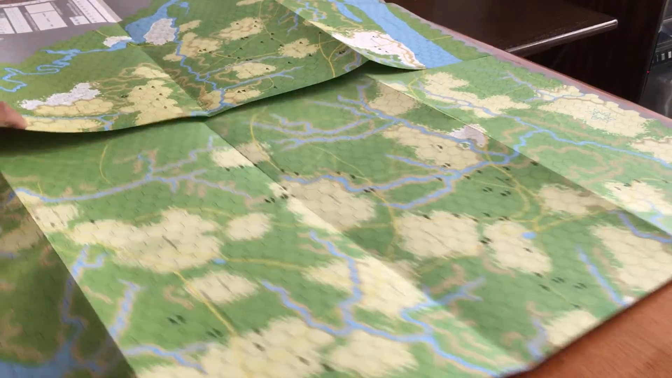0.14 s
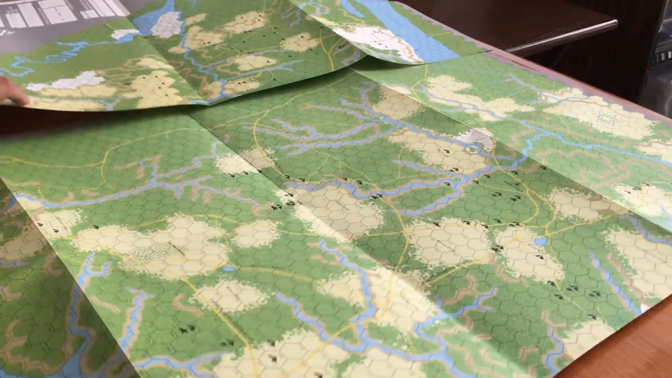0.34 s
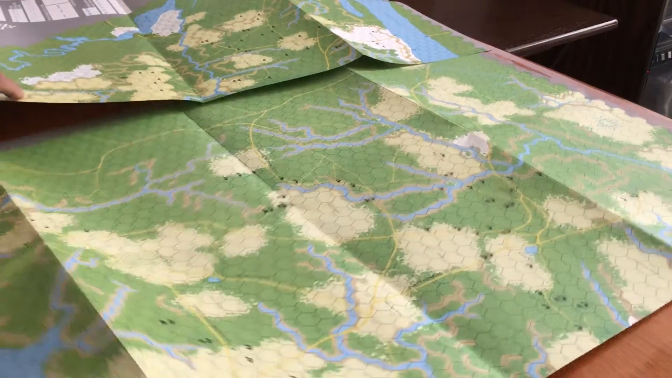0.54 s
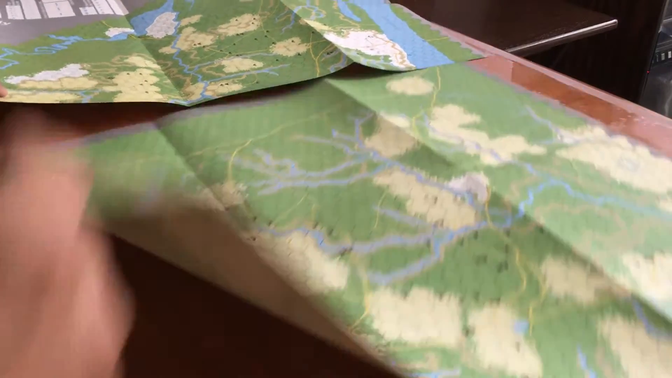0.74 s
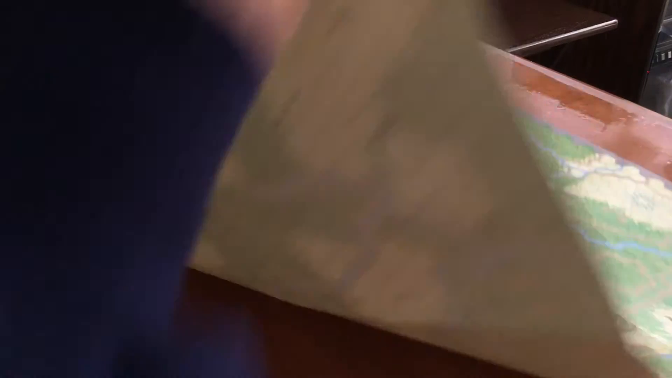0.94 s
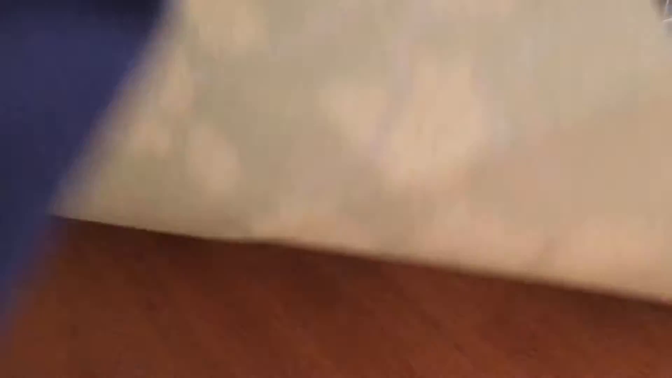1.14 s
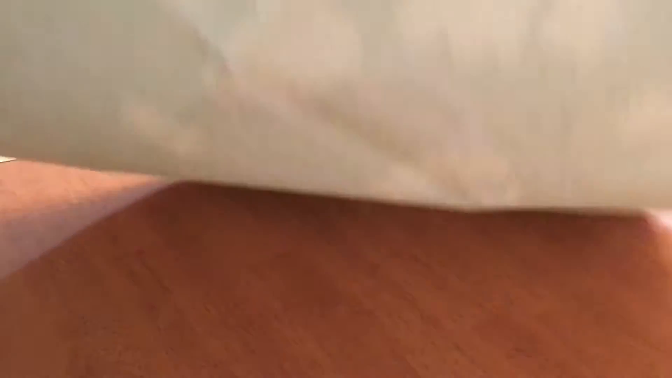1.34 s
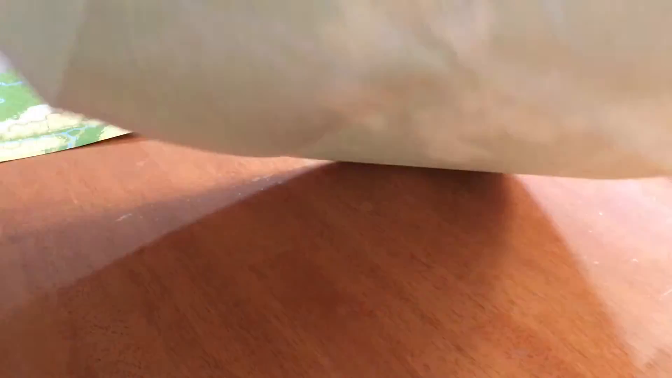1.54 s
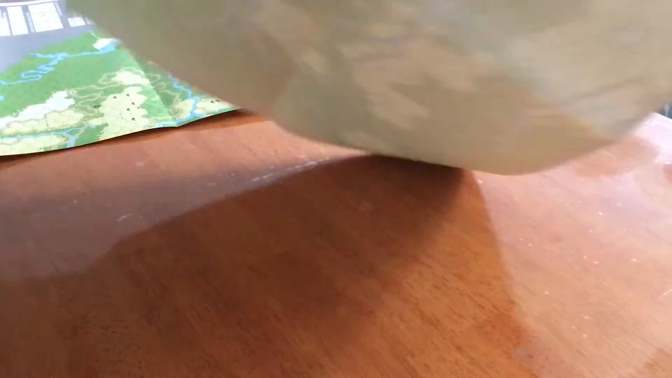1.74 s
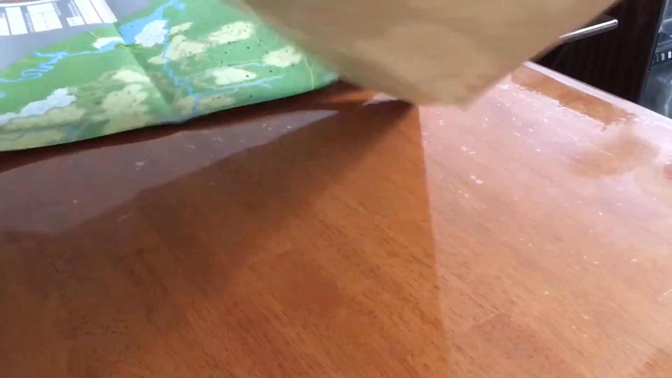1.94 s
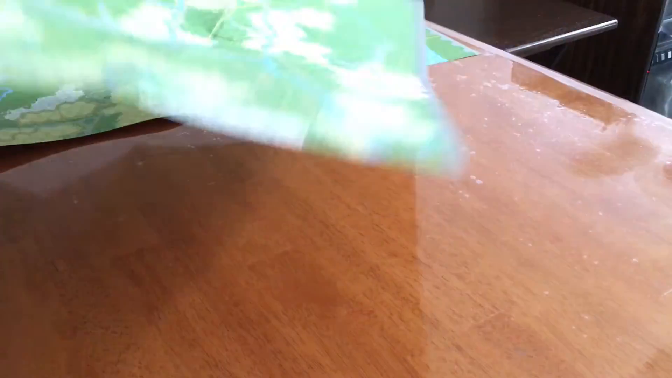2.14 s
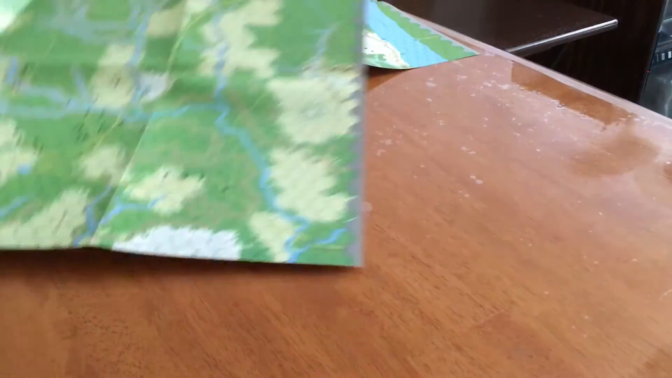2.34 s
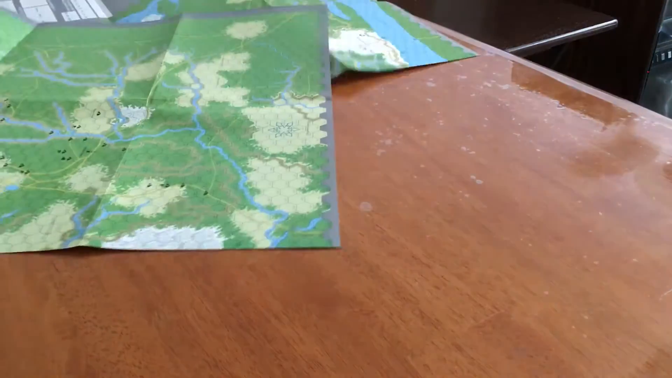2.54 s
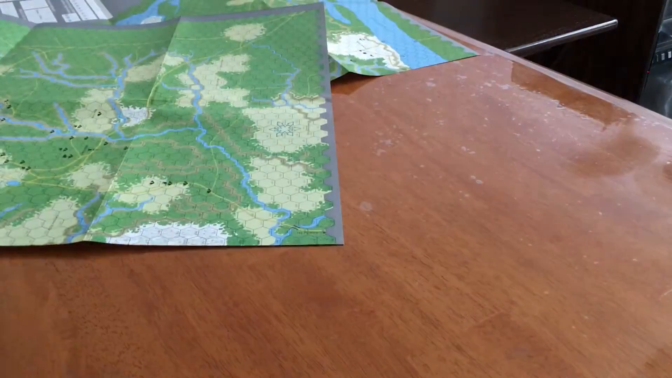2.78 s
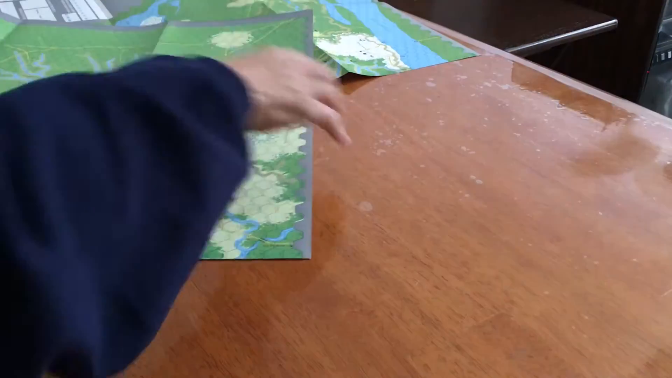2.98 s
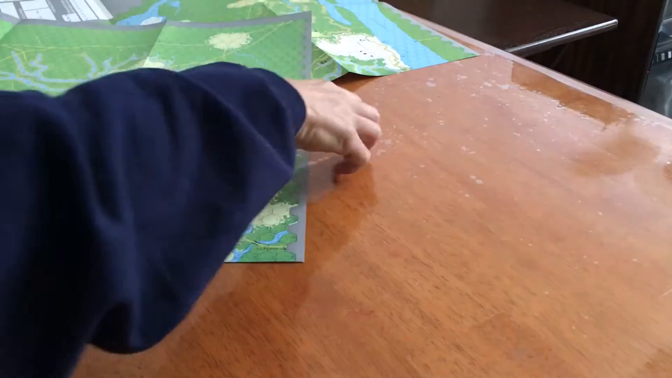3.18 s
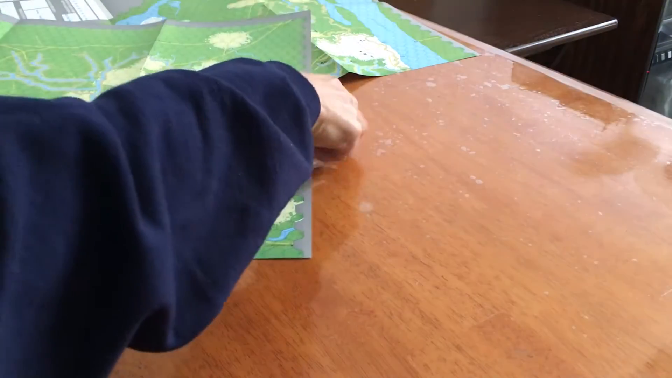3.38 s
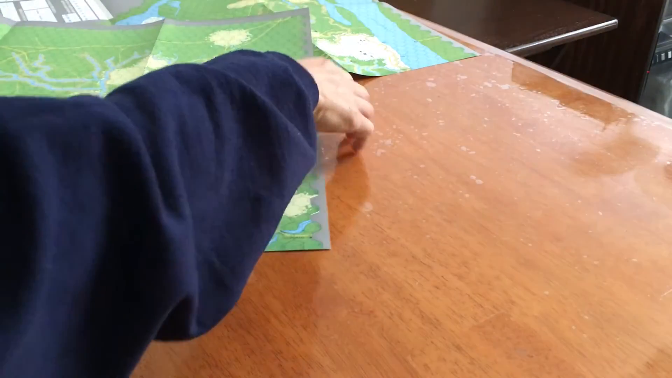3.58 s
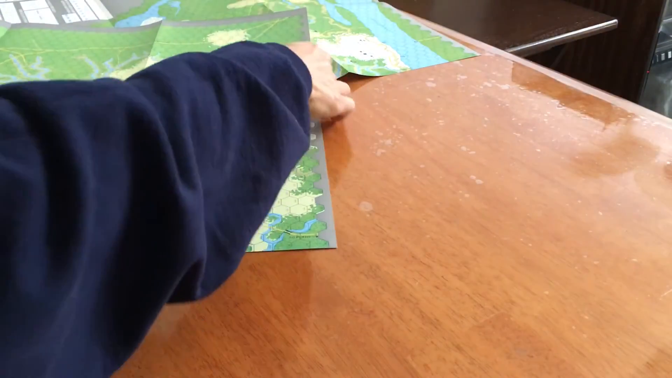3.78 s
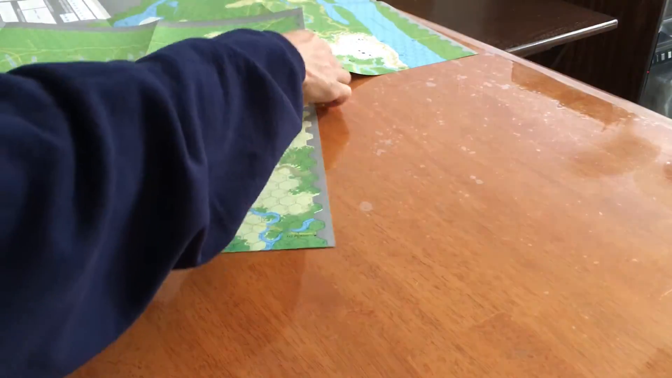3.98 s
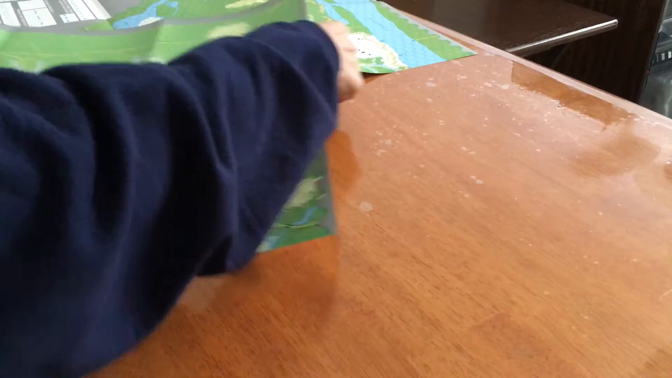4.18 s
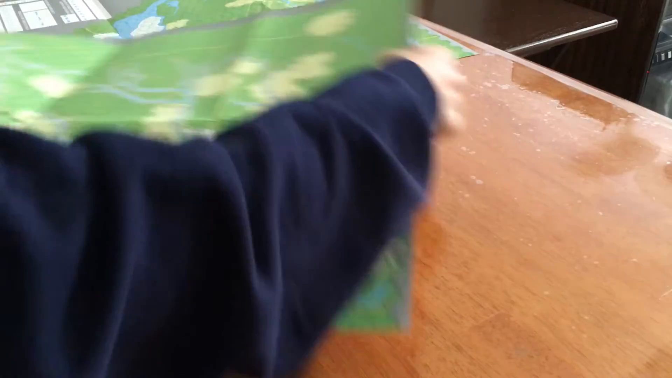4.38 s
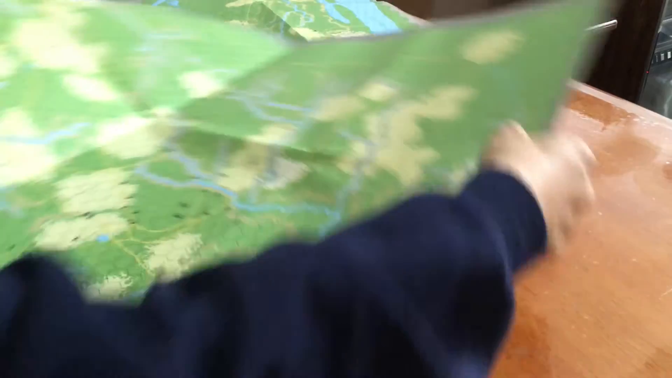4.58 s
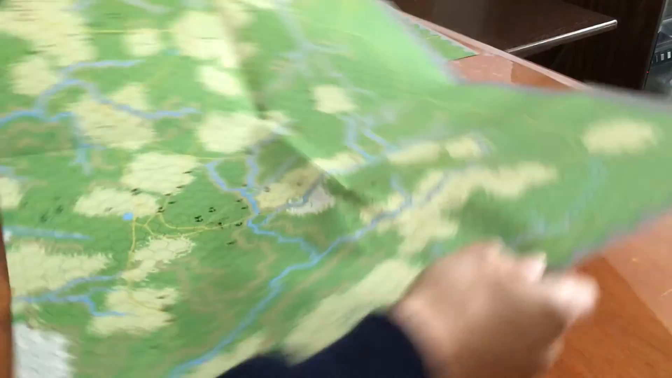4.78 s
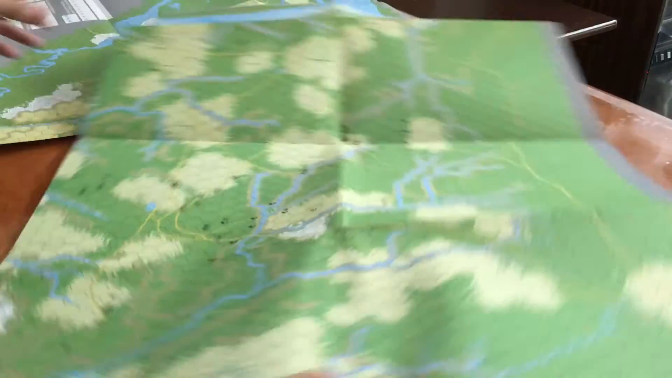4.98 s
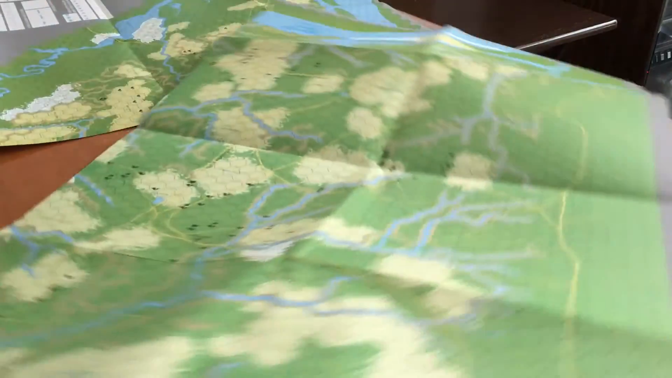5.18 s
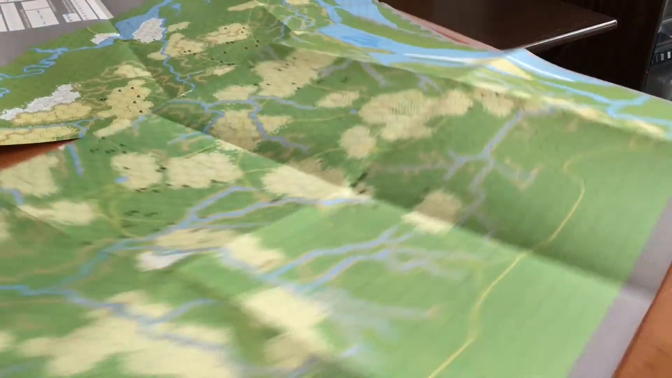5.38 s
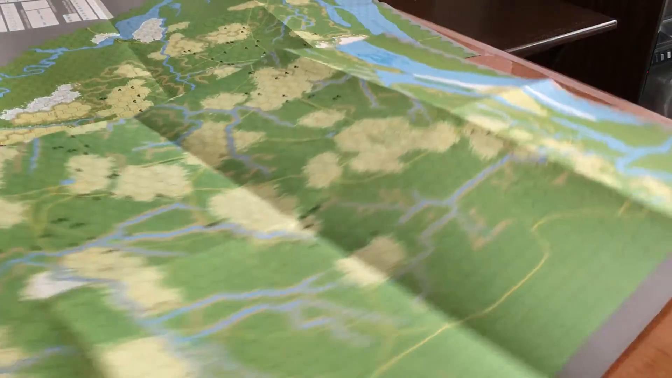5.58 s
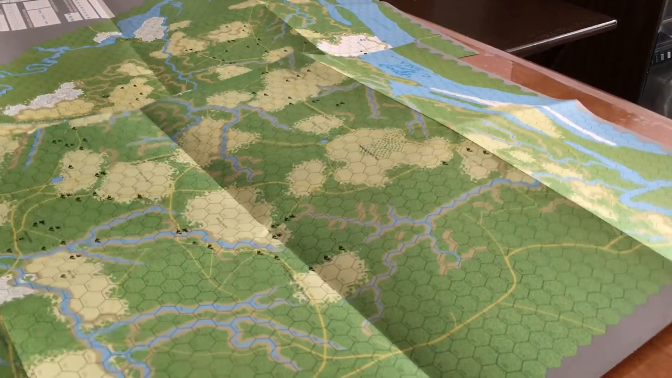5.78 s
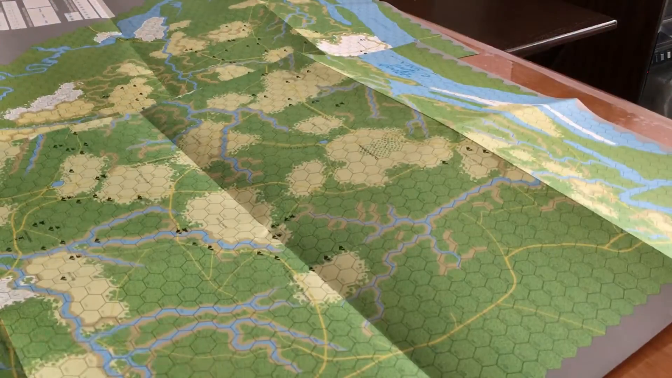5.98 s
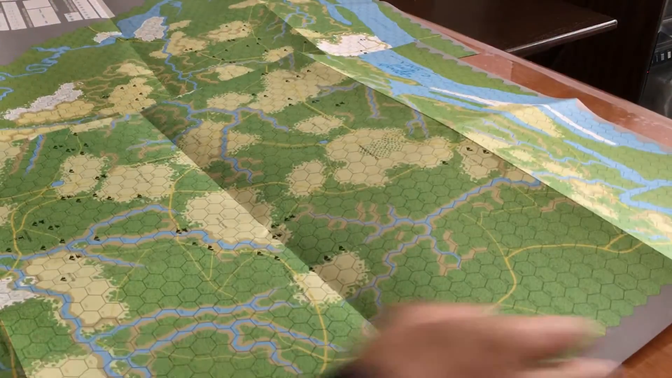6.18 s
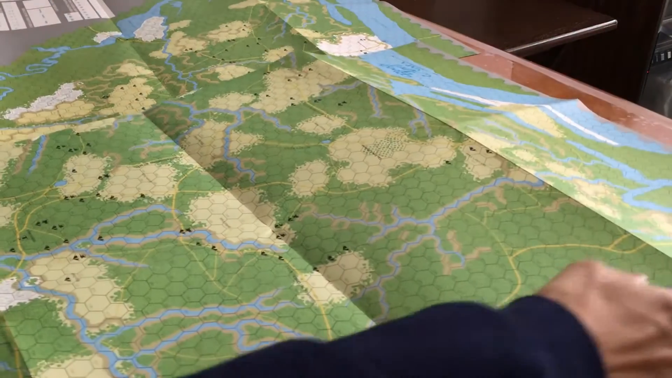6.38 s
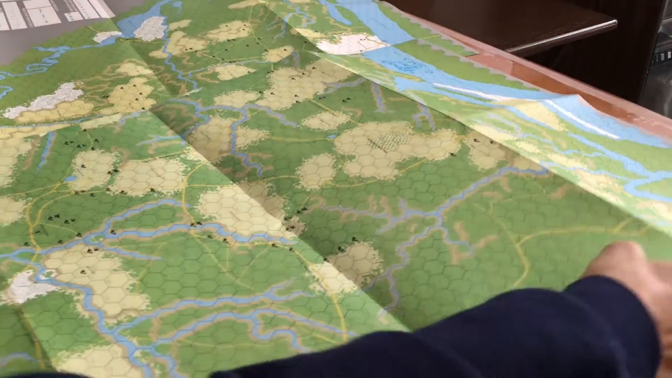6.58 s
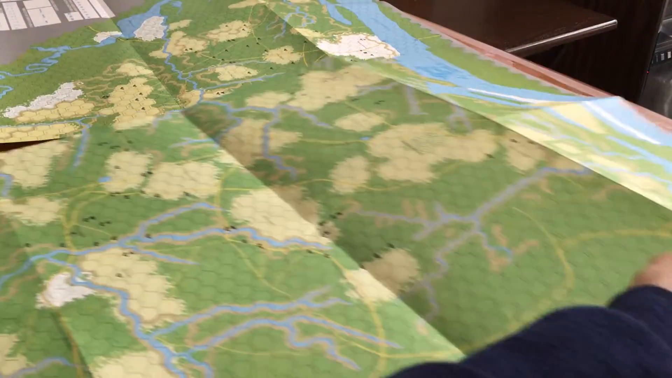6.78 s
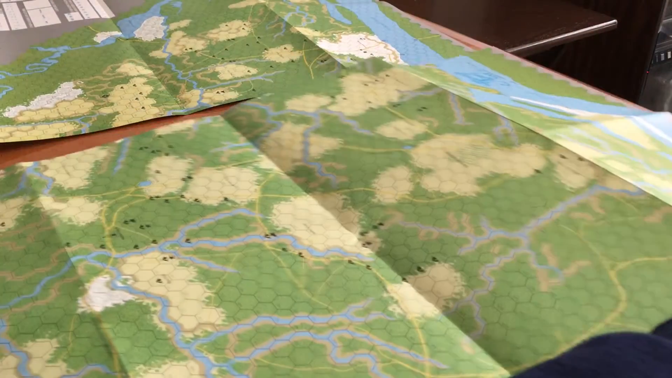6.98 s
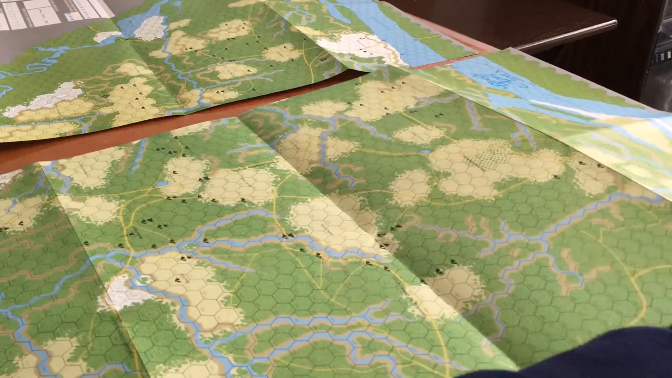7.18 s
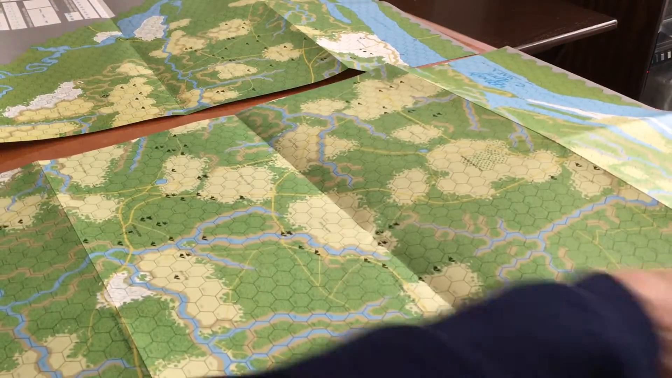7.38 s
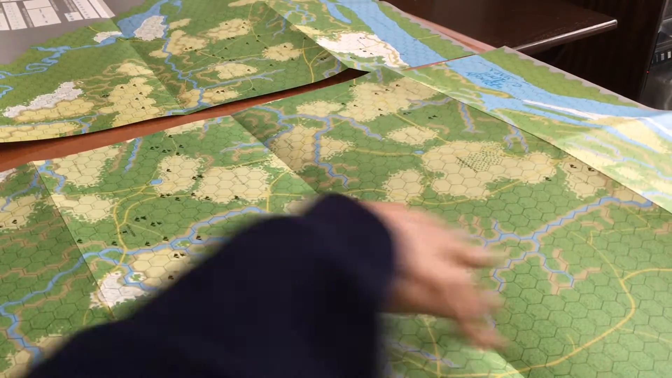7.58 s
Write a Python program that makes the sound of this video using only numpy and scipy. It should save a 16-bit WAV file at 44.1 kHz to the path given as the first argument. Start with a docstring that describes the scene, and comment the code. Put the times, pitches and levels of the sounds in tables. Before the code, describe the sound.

Large stiff folded paper sheets are lifted, flipped with a loud slap and spread over a wooden table, popping, rustling and hissing up close.

```python
"""Stiff panels of large folded paper maps buckle with hollow pops as they are lifted and flipped open:
noise bursts with a jolt, each in its panel's band; one sheet whips over in a run of five, a loud slap.
Creases tick and trapped air thuds the same way; swung sheets flutter and fan the air (shaped noise).
Paper hisses over paper and a wooden table (noise and grains), an edge skids on varnish (ringing grains)
and fingers knock on the wood (decaying modes). Small room, faint rumble, one close microphone."""
import sys
import numpy as np
from scipy import signal
from scipy.fft import rfft, irfft, next_fast_len
from scipy.io import wavfile
from scipy.ndimage import map_coordinates

SR = 44100
rng = np.random.default_rng(int(sys.argv[2]) if len(sys.argv) > 2 else 0)


def unload_wav(signal):
    """Save mono or channel-first audio to the path in sys.argv[1] as 16-bit WAV at rate SR, clipped to [-1, 1]."""
    wavfile.write(
        sys.argv[1],
        SR,
        np.round(np.clip(np.atleast_2d(signal).T, -1, 1) * 32767).astype(np.int16),
    )


N = 336483


def amp(db):
    """Decibels to gain."""
    return 10 ** (np.asarray(db) / 20)


def unit(x):
    """x at rms 1."""
    return x / np.sqrt(np.mean(x ** 2) + 1e-20)


def along(points, hz):
    """(Hz, value) points interpolated on a log frequency axis."""
    point_hz, values = np.transpose(points)
    return np.interp(np.log(hz + 1), np.log(point_hz), values)


def wobble(knots_per_s):
    """Smooth random curve through normally distributed knots."""
    knots = rng.standard_normal(int(N * knots_per_s / SR) + 4)
    return map_coordinates(knots, [np.arange(N) * knots_per_s / SR])


def filtered(x, response):
    """x times a response of frequency."""
    size = next_fast_len(N + 8192)
    spectrum = rfft(x, size) * response(np.fft.rfftfreq(size, 1 / SR))
    return irfft(spectrum, size)[:N]


def coloured(x, spectrum):
    """x shaped by a spectrum in dB, at rms 1."""
    return unit(filtered(x, lambda hz: amp(along(spectrum, hz))))


def add(track, start_s, sound):
    """Mix a sound into the track in place."""
    part = track[round(start_s * SR):][:len(sound)]
    part += sound[:len(part)]


def grains(rate_per_s, spread_db):
    """Random single-sample impulses of uneven size, at rms 1."""
    chance = rng.random(N)
    size = np.clip(rng.standard_normal(N), -2.5, 2.5)
    sign = rng.choice([-1, 1], N)
    return unit((chance < rate_per_s / SR) * sign * amp(spread_db * size))


def resonance(f, hz, width_hz):
    """Response of one resonance, 1 at its centre."""
    return 1j * f * width_hz / (hz * hz - f * f + 1j * f * width_hz)


def gesture(start_s, length_s, attack_s, sag_db_per_s, release_db_per_s):
    """Gain of one movement: it rises, sags while it lasts, then dies away."""
    t = np.maximum(np.arange(N) / SR - start_s, 0)
    rise = np.sin(np.pi / 2 * np.minimum(t / attack_s, 1)) ** 2
    overtime = np.maximum(t - length_s, 0)
    return rise * amp(-sag_db_per_s * t - release_db_per_s * overtime)


def snap(db, low_hz, high_hz, length_s, jolt, bounce, bounce_s):
    """A jolt and a short noisy shiver; the size of the panel sets its band; rms over 10 ms is db."""
    t = np.arange(SR // 5) / SR
    # a slow buckle swells into its shiver, a quick one is mostly jolt
    swell = 1 - np.exp(-4 * t / length_s)
    force = rng.standard_normal(len(t)) * np.exp(-t / length_s) * swell
    force *= np.sqrt(length_s * SR) / np.linalg.norm(force)
    force[0] += jolt / (1 + length_s / 0.0038)
    # the table throws each snap back once, after bounce_s give or take a quarter
    lag = int(bounce_s * SR * rng.uniform(0.76, 1.29)) + 1
    force[lag:] += bounce * force[:-lag]
    # a panel radiates poorly below its band and is too limp above it
    b, a = signal.butter(2, low_hz, 'high', fs=SR)
    limp = signal.butter(3, min(high_hz, SR / 2.2), fs=SR, output='sos')
    pop = signal.sosfilt(limp, signal.lfilter(b, a, force))
    return amp(db) * pop * np.sqrt(SR / 100 / np.sum(pop ** 2))


# Faint steady rumble. Each row: frequency in Hz, relative level in dB.
RUMBLE_SPECTRUM = [(20, -49), (28, -21), (37, 1), (50, -9), (110, -5), (200, -13.5), (450, -25.5),
                   (1500, -26), (5000, -35.5), (16000, -43.5)]


def rumble():
    """The room's steady low rumble: shaped noise."""
    return amp(-65.0) * coloured(rng.standard_normal(N), RUMBLE_SPECTRUM)


# Decay of the room. Each row: frequency in Hz, t60 in s.
ROOM_DECAY = [(100, 0.35), (300, 0.59), (800, 0.21), (2000, 0.29), (6000, 0.2), (15000, 0.23)]


def room(x, wet_db):
    """Nearby walls answer with a decaying noise tail, drawn at random anew every 0.25 s."""
    out, hop = x.copy(), SR // 4
    for start in range(0, N, hop):
        hz, t, bins = signal.stft(rng.standard_normal(SR // 2), SR, nperseg=256)
        decay = amp(-60 * t / along(ROOM_DECAY, hz)[:, None])
        tail = signal.istft(bins * decay, SR, nperseg=256)[1]
        tail = np.pad(tail / np.linalg.norm(tail), (int(0.004 * SR), 0))  # 4 ms delay
        add(out, start / SR, amp(wet_db) * signal.fftconvolve(x[start:start + hop], tail))
    return out


# Table top modes. Each row: frequency in Hz before the shift, relative level in dB, t60 in s.
TABLE_MODES = [(104, -22, 0.083), (291.5, -1, 0.1), (338, 3, 0.034), (520, -6, 0.032), (770, -2, 0.026),
               (1115, -4.5, 0.026), (1600, -8, 0.023)]
# Fingers and sheet edges landing. Each row: start in s, level in dB, hardness (mode rolloff) in Hz.
KNOCKS = [(1.2, -38.5, 700), (1.243, -38, 900), (1.325, -34, 890), (1.505, -34, 1170), (1.711, -39.5, 900),
          (3.17, -42.5, 1780), (3.274, -55, 600), (3.523, -56.5, 600), (3.681, -55, 700),
          (3.753, -58, 1010), (5.905, -44, 1150), (6.114, -38, 2700)]
KNOCK_SHIFT, KNOCK_SCATTER = 1.02, 0.015  # mean and deviation of the mode frequency ratio


def knocking():
    """Soft blows ring the table top; its pitch moves a little with where they land."""
    track, t = np.zeros(N), np.arange(SR // 4) / SR
    onset = 1 - np.exp(-t / 0.0014)
    for start_s, db, hard_hz in KNOCKS:
        ratio = KNOCK_SHIFT + KNOCK_SCATTER * rng.standard_normal()
        for hz, mode_db, t60_s in TABLE_MODES:
            # a soft contact cannot wake the high modes
            softness = 1 + (hz / hard_hz) ** 4
            strength = amp(db + mode_db + rng.normal(0, 1)) / softness
            ring = amp(-60 * t / t60_s) * np.sin(2 * np.pi * hz * ratio * t)
            add(track, start_s, strength * ring * onset)
    return track


# Thin ring of the edge. Each row: frequency in Hz, width in Hz, relative level in dB.
EDGE_RINGS = [(3320, 55, 4), (4500, 220, -3), (6500, 700, -5), (8200, 400, -5), (9300, 260, -4),
              (12000, 200, -10)]
# Edge skidding on varnish. Each row: start in s, length in s, level in dB before the surges.
SKIDS = [(2.66, 0.029, -55), (2.74, 0.027, -64), (2.795, .04, -65), (2.835, .3, -70)]


def skidding():
    """The dropped sheet's edge chatters over the varnish and rings thinly."""
    def ring(f):
        return sum(amp(db) * resonance(f, hz, width_hz) for hz, width_hz, db in EDGE_RINGS)

    push = sum(amp(db) * gesture(start_s, length_s, attack_s=0.012, sag_db_per_s=24, release_db_per_s=231)
               for start_s, length_s, db in SKIDS)
    chatter = unit(filtered(grains(990, spread_db=3), ring))
    return push * amp(3 * wobble(45)) * chatter


# Colour of rubbing paper as the microphone hears it, with its dips near 4950 and 10400 Hz.
# Each row: frequency in Hz, relative level in dB per Hz.
HISS_SPECTRUM = [(300, -14.5), (900, -7.5), (2200, 0.5), (3600, 0.5), (4950, -2), (5800, -0.5), (7200, -4),
                 (9300, -3.5), (10400, -9), (11500, -6.5), (16000, -11)]
# Paper sliding over paper or wood. Each row: start in s, length in s, friction in dB and treble
# against friction in dB, both before the surges and offsets below.
SLIDES = [(0.0, 0.37, -58, -2), (0.4, 0.26, -58, 4), (0.661, 0.13, -48.5, -4), (0.85, 0.25, -58, -14),
          (1.083, 0.28, -65.5, -6), (1.244, 0.044, -52, -10), (1.354, 0.48, -69, -0.5),
          (1.68, 0.065, -70.5, -17), (1.804, 0.087, -62, -5.5), (1.92, 0.19, -59, -15.5),
          (2.456, .055, -59.5, -2), (2.562, 0.24, -58, -9), (2.858, 0.16, -61.5, -4.5),
          (3.093, 0.28, -67, -17), (3.34, 0.32, -65.5, -13), (3.648, 0.17, -75.5, -8),
          (3.868, 0.19, -70.5, -0.5), (4.03, 0.26, -62.5, -12), (4.228, 0.14, -59, 1.5),
          (4.327, 0.32, -52, 2.5), (4.642, 0.17, -51.5, -3.5), (4.897, 0.17, -60, 0.5),
          (5.047, 0.083, -54.5, 2), (5.2, 0.23, -51.5, -0.5), (5.41, 0.28, -55, -2),
          (5.655, 0.14, -52.5, -5), (5.98, 0.15, -63.5, -12), (6.155, 0.37, -77.5, 1),
          (6.386, .15, -66.5, -7), (6.556, 0.12, -54.5, -10), (6.68, 0.18, -56, -1.5),
          (6.899, .16, -57.5, -11), (7.09, 0.073, -62, -7.5), (7.273, 0.053, -62.5, -11),
          (7.417, .15, -71, -5)]
SLIDE_ATTACK_S, SLIDE_SAG_DB_PER_S, SLIDE_RELEASE_DB_PER_S = 0.044, 13.5, 80
SLIDE_RUN_UP = 0.34  # share of its length added to the attack


def sliding():
    """Fibres catch and slip by the thousand; each slide has its own strength and brightness."""
    coarse_power, fine_power = np.zeros((2, N))
    for start_s, length_s, db, treble_db in SLIDES:
        attack_s = SLIDE_ATTACK_S + SLIDE_RUN_UP * length_s
        gain = amp(db) * gesture(start_s, length_s, attack_s, SLIDE_SAG_DB_PER_S, SLIDE_RELEASE_DB_PER_S)
        coarse_power += gain ** 2
        fine_power += (gain * amp(treble_db)) ** 2
    rub = coloured(rng.standard_normal(N) + 0.62 * grains(2500, spread_db=9.5), HISS_SPECTRUM)
    fine = filtered(rub, lambda hz: 1 / (1 + (8000 / (hz + 1)) ** 4))
    coarse = rub - fine
    # coarse and fine fibres grip in their own uneven surges
    coarse_hiss = coarse * np.sqrt(coarse_power) * amp(0.7 * wobble(22))
    fine_hiss = fine * np.sqrt(fine_power) * amp(2 + 0.7 * wobble(22))
    return (coarse_hiss + fine_hiss) * amp(2.5 + 1.4 * wobble(35))


# Air squeezed out under a panel or a palm. Each row: start in s, level in dB, lowest frequency in Hz.
PUFFS = [(1.141, -51, 108), (1.464, -45, 140), (1.751, -49, 126), (2.035, -35, 101), (2.5, -41, 62.5),
         (2.631, -44, 64), (3.174, -43.5, 68), (3.28, -50, 64), (3.753, -50.5, 68), (5.044, -45, 53),
         (5.349, -41.5, 59), (5.79, -49.5, 73.4), (5.905, -51, 60)]
PUFF_SPAN, PUFF_LENGTH_S = 2.67, 0.023  # highest over lowest Hz; decay


def puffing():
    """Trapped air escapes with a low, soft thud."""
    track = np.zeros(N)
    for start_s, db, low_hz in PUFFS:
        thud = snap(db, low_hz, PUFF_SPAN * low_hz, PUFF_LENGTH_S, jolt=1.3, bounce=0.28, bounce_s=0.002)
        add(track, start_s, thud)
    return track


# Creases and edges clicking. Each row: start in s, level in dB, highest frequency in Hz.
TICKS = [(1.281, -57, 8000), (1.502, -52.5, 4860), (1.619, -60, 4950), (2.02, -47, 8400),
         (2.462, -64.5, 11300), (2.494, -52.5, 8600), (2.665, -58, 10800), (3.17, -56.5, 5700),
         (5.575, -44, 8300), (5.768, -46, 4020), (5.887, -53, 3970), (5.9027, -48.5, 9400)]
TICK_LOW_HZ, TICK_LENGTH_S = 1050, 0.0047


def ticking():
    """Creases and edges give short, bright clicks."""
    track = np.zeros(N)
    for start_s, db, top_hz in TICKS:
        add(track, start_s, snap(db, TICK_LOW_HZ, top_hz, TICK_LENGTH_S, jolt=1.8, bounce=0.14, bounce_s=0.001))
    return track


# Colour of the bending sheet. Each row: frequency in Hz, relative level in dB.
FLUTTER_SPECTRUM = [(100, 3), (250, -8), (500, -5), (1000, -5.5), (1700, -15), (2600, -15.5), (6000, -71),
                    (16000, -56)]
# Colour of the fanned air. Each row: frequency in Hz, relative level in dB.
AIR_SPECTRUM = [(20, -3), (50, -0.5), (100, -4.5), (170, 5), (300, -2.5), (450, -15.5), (900, -38),
                (4000, -77)]
# Sheet swung in the hands. Each row: start in s, length in s, flutter in dB and fanned air in dB,
# both before the offsets and surges below.
SWINGS = [(0.534, 0.96, -59.5, -58), (1.18, 0.21, -51, -47), (1.415, 0.26, -56.5, -44),
          (2.31, 0.19, -66.5, -62.5), (2.468, .33, -53.5, -62), (2.998, 0.53, -70.5, -82),
          (4.156, 0.051, -56.5, -62), (4.496, 0.54, -60.5, -61.5), (5.027, 0.4, -60, -60),
          (5.718, 0.19, -58, -58.5), (6.57, 0.13, -60.5, -59.5), (7.042, 0.4, -85, -76)]
SWING_ATTACK_S, SWING_SAG_DB_PER_S, SWING_RELEASE_DB_PER_S = 0.073, 1.5, 63


def flexing():
    """The bending sheet gives a run of small soft buckles and fans the air."""
    buckles = grains(420, spread_db=0.5) + 0.64 * rng.standard_normal(N)
    flutter = coloured(buckles, FLUTTER_SPECTRUM) * amp(-3.5 + 3.1 * wobble(30))
    air = coloured(rng.standard_normal(N), AIR_SPECTRUM) * amp(-6.5 + 3.5 * wobble(20))
    track = np.zeros(N)
    for start_s, length_s, flutter_db, air_db in SWINGS:
        swing = gesture(start_s, length_s, SWING_ATTACK_S, SWING_SAG_DB_PER_S, SWING_RELEASE_DB_PER_S)
        track += swing * (amp(flutter_db) * flutter + amp(air_db) * air)
    return track


# What sheet and table lift or swallow. Each row: frequency in Hz, width in Hz, gain in dB.
BODY_RESONANCES = [(305, 50, 5), (470, 110, 2), (640, 100, -1), (830, 130, 2.5), (1170, 100, 2),
                   (1680, 170, 3.5), (2150, 130, 4), (2700, 500, -4)]


def hollow(x):
    """Resonances in series: the hollow colour of a big sheet held over a table."""
    def response(f):
        stages = [1 + (amp(db) - 1) * resonance(f, hz, width_hz) for hz, width_hz, db in BODY_RESONANCES]
        return np.prod(stages, axis=0)

    return filtered(x, response)


WHIP_AT_S, WHIP_DB, WHIP_HZ, WHIP_LENGTH_S = 2.037, -32, 1620, 0.0065  # first panel
WHIP_GAP_S, WHIP_LOSS_DB, WHIP_HZ_RATIO = 0.0095, 2, 0.6  # from each panel to the next


def whip(count):
    """The flipped sheet pulls flat panel after panel, each larger (lower) and weaker."""
    return [(WHIP_AT_S + k * WHIP_GAP_S, WHIP_DB - k * WHIP_LOSS_DB, WHIP_HZ * WHIP_HZ_RATIO ** k, WHIP_LENGTH_S)
            for k in range(count)]


# Panels snapping through. Each row: start in s, level in dB, lowest frequency in Hz, length in s.
BUCKLES = [(0.281, -54.5, 855, 0.0043), (0.492, -51, 590, 0.019), (0.607, -54, 390, 0.0041),
           (0.647, -45, 490, 0.007), (.722, -47.5, 500, 0.0054), (.735, -44, 550, 0.0042),
           (.788, -37.5, 455, 0.0012), (0.837, -44, 382, 0.003), (0.843, -39, 283, 0.0034),
           (0.934, -46.5, 250, 0.051), (1.009, -46, 236, .022), (1.196, -42.5, 199, 0.019),
           (1.239, -39, 474, .003), (1.315, -36, 393, 0.0043), (1.345, -43.5, 760, 0.0038),
           (1.44, -43, 696, 0.0039), (1.5, -33.5, 247, 0.0039), (1.7, -46.5, 262, 0.0058),
           (1.71, -41, 397, 0.0093), (2.029, -41, 400, 0.0024), (2.084, -44.5, 700, 0.054),
           (2.492, -45, 234, 0.018), (2.601, -46.5, 393, .025), (2.881, -52, 623, 0.039),
           (3.173, -55.5, 437, 0.0012), (3.256, -57.5, 466, 0.021), (3.751, -59.5, 380, 0.039),
           (4.257, -47.5, 840, 0.013), (4.409, -53.5, 700, 0.032), (4.589, -54, 513, 0.0034),
           (4.685, -46.5, 810, 0.043), (4.848, -43, 336, 0.0019), (5.0176, -31, 550, 0.0024),
           (5.157, -36.5, 790, 0.0012), (5.293, -46, 540, 0.0077), (5.298, -32.5, 593, 0.003),
           (5.576, -49, 544, 0.0031), (5.915, -49, 220, 0.0053), (7.158, -64, 400, 0.017)]
# upper edge of a 500 Hz panel at -42 dB; smaller panels and harder snaps reach higher
REACH_HZ, REACH_POWER, REACH_DB_PER_OCTAVE = 1355, 0.24, 31
REBOUND_S, REBOUND_DB = 0.014, -11
CREASE_DB, CREASE_LOW_HZ, CREASE_HIGH_HZ = -18, 3000, 4600
CREASE_SLOW_S = 0.01  # a buckle this long halves its crease click


def buckling():
    """Each panel pops, clicks at its crease and springs back once, more weakly."""
    track = np.zeros(N)
    for start_s, db, panel_hz, length_s in BUCKLES + whip(count=5):
        size_reach = (panel_hz / 500) ** REACH_POWER
        top_hz = REACH_HZ * size_reach * 2 ** ((db + 42) / REACH_DB_PER_OCTAVE)
        for delay_s, drop_db in ((0, 0), (REBOUND_S, REBOUND_DB)):
            pop = snap(db + drop_db, panel_hz, top_hz, length_s, jolt=5.8, bounce=0.19, bounce_s=0.001647)
            add(track, start_s + delay_s, pop)
        click = snap(db + CREASE_DB, CREASE_LOW_HZ, CREASE_HIGH_HZ, length_s,
                     jolt=1.6, bounce=0.13, bounce_s=0.00123)
        add(track, start_s, click / (1 + length_s / CREASE_SLOW_S))
    return track


def scene():
    """Paper and table in the room, over its faint rumble; one microphone feeds both channels."""
    sheet = room(hollow(buckling() + flexing()), wet_db=-6.0)
    contacts = room(ticking() + puffing() + knocking() + skidding(), wet_db=-9)
    hiss = room(sliding(), wet_db=-15.5)
    mono = sheet + contacts + hiss + rumble()
    return np.array([mono, mono])


LOW_CUT_HZ, TOP_HZ = 29, 15900


def record(dry):
    """The recorder sheds the deepest bass and keeps nothing above its band limit."""
    def band(hz):
        return (hz < TOP_HZ) / np.sqrt(1 + (LOW_CUT_HZ / (hz + 1)) ** 8)

    return np.array([filtered(channel, band) for channel in dry])


dry = scene()
out = record(dry)
unload_wav(out)
```